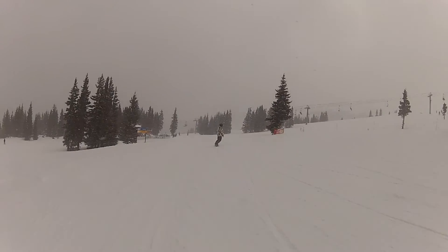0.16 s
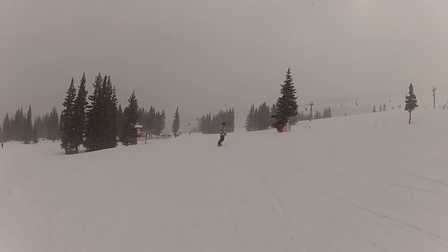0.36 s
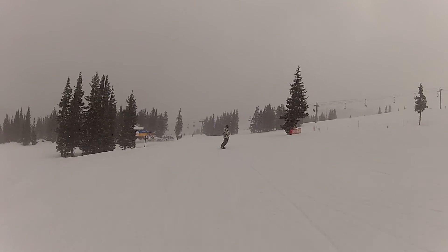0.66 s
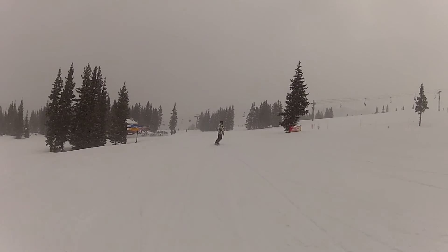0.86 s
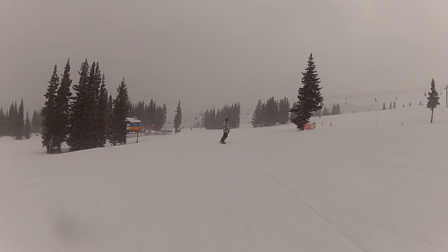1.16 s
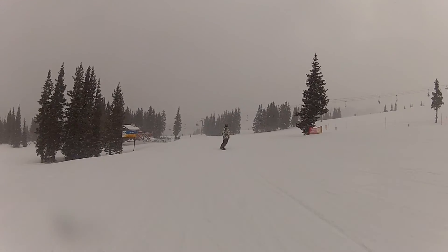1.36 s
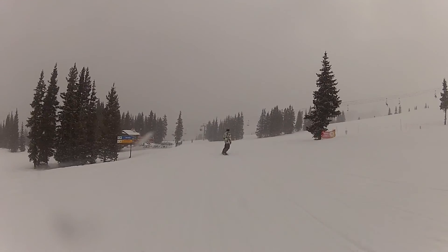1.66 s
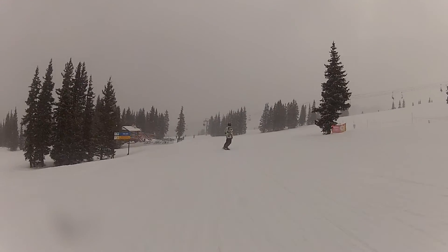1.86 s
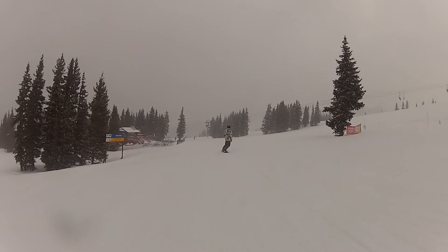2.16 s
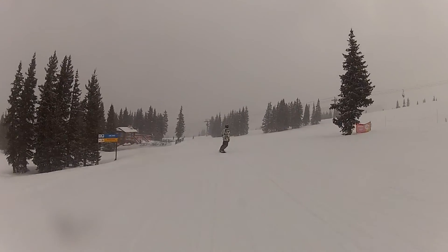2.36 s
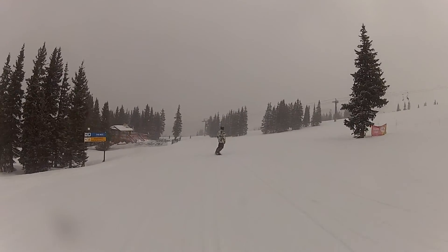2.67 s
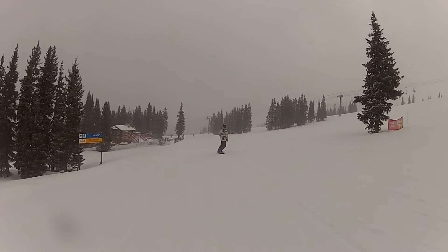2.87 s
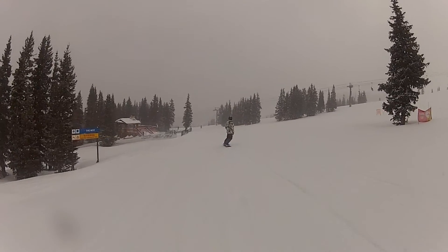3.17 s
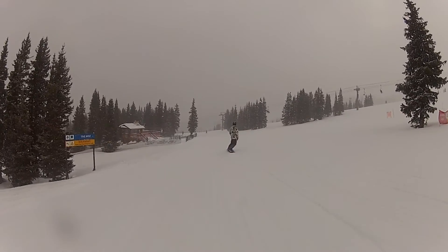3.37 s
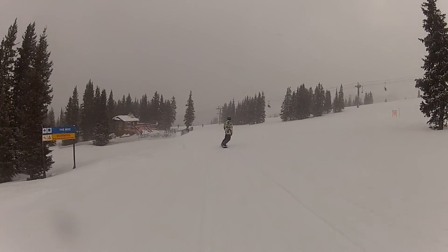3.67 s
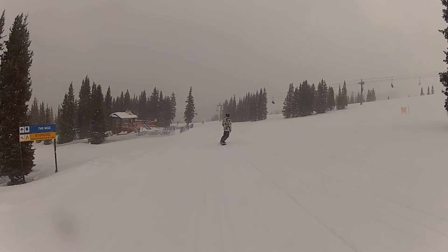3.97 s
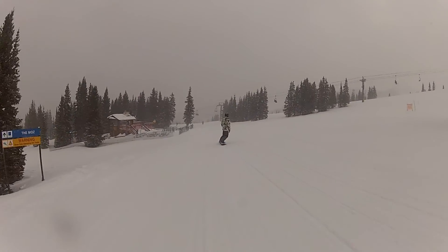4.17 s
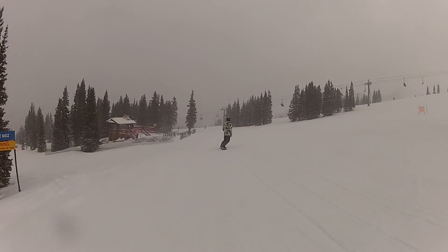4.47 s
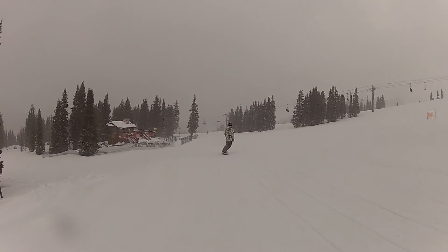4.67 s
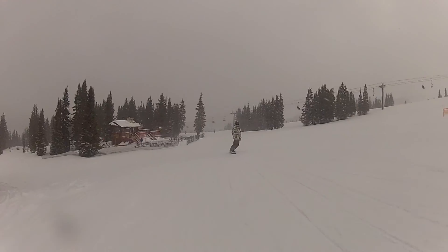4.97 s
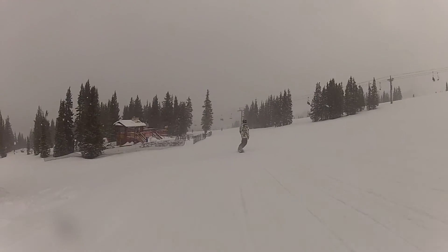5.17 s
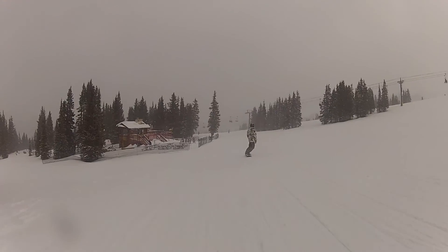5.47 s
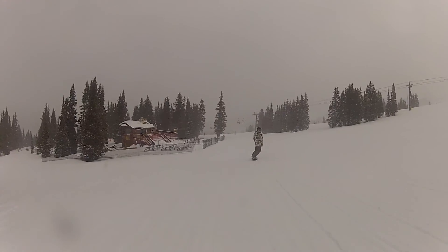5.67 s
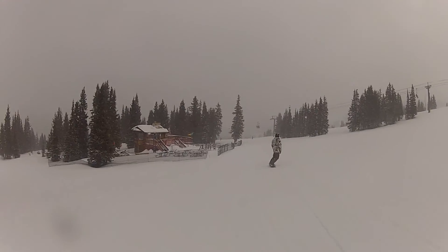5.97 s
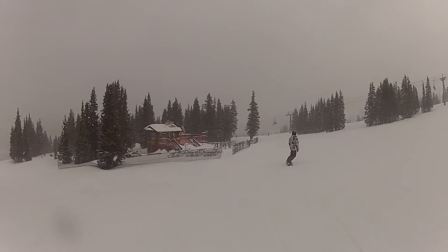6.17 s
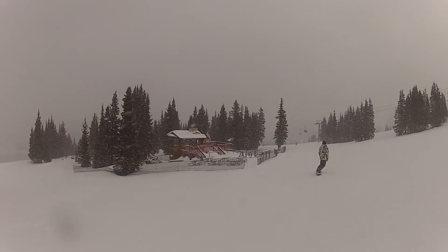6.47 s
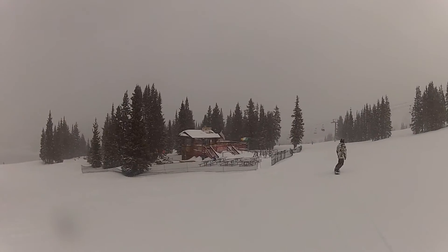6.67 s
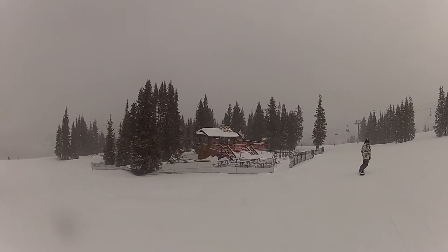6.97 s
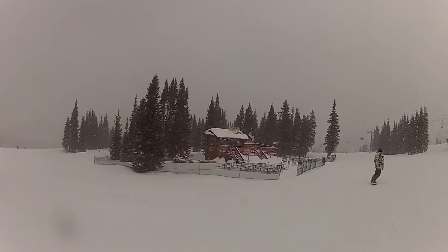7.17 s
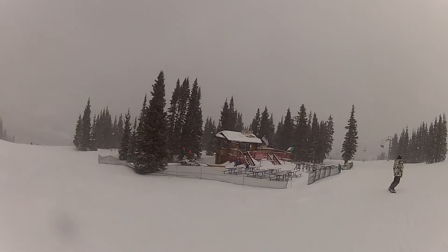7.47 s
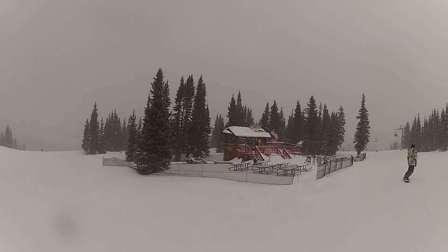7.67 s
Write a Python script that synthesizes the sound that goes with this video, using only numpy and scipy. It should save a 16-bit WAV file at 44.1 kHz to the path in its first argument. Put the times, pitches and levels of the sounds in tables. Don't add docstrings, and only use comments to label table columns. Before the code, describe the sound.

A snowboard hisses and scrapes over snow while wind rumbles and thumps on a sealed camera housing, with sharp plastic clicks and tiny icy ticks throughout.

```python
import sys
import numpy as np
from scipy import signal
from scipy.io import wavfile
from scipy.ndimage import uniform_filter1d, minimum_filter1d

SR = 44100
rng = np.random.default_rng(int(sys.argv[2]) if len(sys.argv) > 2 else 0)


def nominal_scale(level):
    x = np.asarray(level, float) / 20
    return 10 ** x


def digitize_waveform(pressure):
    field = np.atleast_2d(pressure).T
    bounded = np.clip(field, -1, 1)
    quanta = np.round(bounded * 32767).astype(np.int16)
    wavfile.write(sys.argv[1], SR, quanta)


N = 344421


def evened(x):
    return x / np.sqrt(np.mean(x ** 2) + 1e-20)


def control(rows, column):
    rows = np.array(rows)
    return np.interp(np.arange(N) / SR, rows[:, 0], rows[:, column])


def bump(centre_s, length_s):
    t = np.arange(N) / SR
    return np.exp(-(2 * (t - centre_s) / length_s) ** 2)


def noise(colour, size, patchy_db, flicker_db):
    frames = 4 * N // size + 5
    hz = np.fft.rfftfreq(size, 1 / SR)
    real, imaginary, patches = rng.standard_normal((frames, len(hz), 3)).T
    patches = uniform_filter1d(patches, size=8, axis=0)
    patches = evened(uniform_filter1d(patches, size=10, axis=1))
    flicker = evened(uniform_filter1d(rng.standard_normal(frames), size=4))
    curve_hz, curve_db = np.transpose(colour)
    colour_db = np.interp(np.log(hz + 1), np.log(curve_hz + 1), curve_db, left=-90, right=-90)
    level_db = colour_db[:, None] + patchy_db * patches + flicker_db * flicker
    z = (real + 1j * imaginary) * nominal_scale(level_db)
    return evened(signal.istft(z, nperseg=size, noverlap=3 * size // 4)[1][:N])


def ring(modes, phases):
    t = np.arange(600) / SR
    x = 0
    for (hz, db, t60), phase in zip(modes, phases):
        x = x + nominal_scale(db - 60 * t / t60) * np.sin(2 * np.pi * (hz * t + phase))
    x = x * (1 - np.exp(-t / .00045))
    return x / abs(x).max()


# (time [s], level [dB])
WIND_ROAR = [(0.0, -49), (0.82, -52), (0.96, -52.5), (2.54, -51.5), (2.56, -48), (3.5, -52.5), (3.59, -49),
             (3.81, -54.5), (4.3, -55), (6.07, -60), (6.29, -57), (6.35, -61.5), (6.63, -59.5),
             (7.81, -55.5)]
# (time [s], level over the buffeting [dB], length [s])
GUSTS = [(0.798, 15, .1), (1.073, 10, 0.081), (2.54, 5, .1), (2.766, 11, 0.13), (3.482, 10, 0.11),
         (3.7, 13.5, 0.11), (5.123, 6, .08), (6.26, 8, 0.11), (7.094, 5.5, 0.12), (7.355, 12, .06),
         (7.56, 13, 0.073)]
# (frequency [Hz], level [dB per Hz])
BUFFET_COLOUR = [(7.1, -33.5), (12, 4), (81, -3.5), (120, -4), (160, -26), (260, -120)]
# (frequency [Hz], level [dB per Hz])
ROAR_COLOUR = [(35, -47), (60, 13), (86, -2), (221, -3), (372, -7), (633, -20.5), (900, -18.5), (1170, -60),
               (1980, -120)]
# (frequency [Hz], level [dB per Hz])
AIR_COLOUR = [(600, 3.5), (1400, -10), (5000, -8), (5900, -10)]


def wind():
    roar_db = control(WIND_ROAR, column=1)
    gust_db = sum(db * bump(s, length_s) for s, db, length_s in GUSTS)
    buffet_db = -57.5 + 0.5 * (roar_db + 53) + gust_db
    buffet = nominal_scale(buffet_db) * noise(BUFFET_COLOUR, size=4096, patchy_db=1.7, flicker_db=3.5)
    roar = nominal_scale(roar_db + 0.55) * noise(ROAR_COLOUR, size=1024, patchy_db=0.5, flicker_db=1.03)
    air = nominal_scale(-70.0) * noise(AIR_COLOUR, size=256, patchy_db=4.5, flicker_db=5.5)
    lurch_s, lurch_hz = 6.255, 30
    swing = np.sin(2 * np.pi * lurch_hz * (np.arange(N) / SR - lurch_s))
    lurch = nominal_scale(-43.5) * bump(lurch_s, length_s=.09) * swing
    return buffet + roar + air + lurch


# (time [s], level [dB])
SLIDE = [(0.0, -52.5), (0.45, -55), (0.9, -56.5), (1.8, -59), (2.25, -54), (2.5, -56), (2.75, -51),
         (3.1, -58), (3.3, -54), (3.9, -59), (4.6, -63), (5.5, -66.5), (6.3, -67.5), (6.42, -70.5),
         (6.52, -69), (6.56, -58.5), (6.9, -62), (7.81, -62.5)]
# (frequency [Hz], level [dB per Hz])
HISS_COLOUR = [(290, -19), (500, 1), (647, -9), (780, -8.5), (948, 2), (1360, 2.5), (1880, -2.5), (2280, 2),
               (3020, -4), (3480, -2.5), (4330, -18), (5160, -7), (5900, -22.5), (7670, -45), (13000, -120)]
# (frequency [Hz], level [dB], t60 [s])
SHELL = [
    [(940, 1, 0.0034), (1427, 8.5, 0.0053)],
    [(1900, -1.5, 0.0046), (2236, 3.5, 0.006), (2460, -23, 0.015)],
    [(3385, -18, 0.035), (3537, 1, 0.0068), (3790, 6, 0.0022)],
    [(4494, 26.5, 0.0021), (5016, 4, 0.0061)],
]


def board():
    hiss = noise(HISS_COLOUR, size=256, patchy_db=2.0, flicker_db=0.6)
    ridge_hz, ridge_width_hz = 2197, 160
    ridge = signal.lfilter(*signal.iirpeak(ridge_hz, ridge_hz / ridge_width_hz, SR), hiss)
    hiss = hiss + nominal_scale(-12) * evened(ridge)
    grains_per_s = 320
    lands = rng.random(N) < grains_per_s / SR
    size = nominal_scale(3.2 * np.minimum(rng.exponential(1, N), 3)) * lands
    grains = 0
    for group, group_db in zip(SHELL, (-11.5, -0.5, -4.0, -3.5)):
        spread_db = 7.1 * rng.standard_normal(N).clip(-2, 2)
        share = nominal_scale(group_db + spread_db) * rng.choice([-1, 1], N)
        grains = grains + signal.oaconvolve(size * share, ring(group, rng.random(3)))[:N]
    return nominal_scale(control(SLIDE, column=1)) * (nominal_scale(1.0) * hiss + nominal_scale(-5.5) * evened(grains))


# (time [s], peak level [dB], brightness [dB per mode group], focus [dB per group squared])
KNOCKS = [(0.0739, -21, 8, -10.5), (0.6062, -30.5, -4, -2.5), (0.9413, -26.5, -15.5, -11.2),
          (1.0898, -26, -4, -3.5), (1.3748, -28.5, -22, -12.5), (1.411, -26, -2, -6.0),
          (1.6179, -16.5, -0.3, -8.5), (2.9365, -28, -4, -7), (3.8273, -30, 1, -1.5),
          (3.8341, -18, 12.5, -10), (4.0037, -31.5, 6, -3.5), (4.6325, -26.3, 6.5, -0.5),
          (4.6495, -30.3, 18, -15), (5.0732, -31.5, 10.5, -5), (5.0883, -36.6, 1.5, -0.5),
          (5.1829, -23.9, 9, -11.5), (5.2468, -28.5, 15, -15), (5.2622, -37, 0, 0),
          (5.2992, -36.5, 4.4, -1.4), (5.3627, -39, 8.6, -4.4), (5.8215, -42.5, -4, -6.2),
          (6.1, -36, -9.5, -1.5), (6.1528, -33, -8, -3), (6.2038, -33.5, -5, -3.0), (6.2993, -32, -4, -7),
          (6.318, -36.4, -2, -3), (6.3438, -32.5, 0.8, -2.5), (6.9163, -32, -1, -0.3),
          (7.1525, -35.5, -1, -3), (7.7962, -23.5, -2.5, -7.5)]
# (time [s], peak level [dB], brightness [dB per mode group])
BACK_TICKS = [(0.1376, -34, -21), (0.4091, -36.5, -9), (0.7034, -31.5, -5), (1.0032, -32.5, -5),
              (1.5406, -33.5, -31), (1.7427, -40.8, -3.9), (1.8893, -37.5, -6), (2.1632, -29.5, -7),
              (2.3833, -36.5, -2), (3.2512, -37, -4.0), (3.2726, -36, 0), (3.636, -35, -12),
              (3.7283, -35.5, -5.0), (3.911, -38.5, -4.5), (4.1316, -33.5, -7.5), (4.816, -45.5, 1),
              (5.2127, -40, -6.9), (5.3466, -40.5, -14), (5.7269, -50, -8.2), (5.8749, -51, -3),
              (6.2316, -40, -7), (6.293, -45.8, -12), (6.368, -37, -10), (6.8443, -47, 1),
              (6.9563, -42, -9), (7.319, -41, -3), (7.3594, -36, -4.5), (7.4979, -37, -28),
              (7.624, -47.5, 2), (7.6536, -38.5, -2)]
# (time [s], peak level [dB], brightness [dB per mode group])
SIDE_TICKS = [(0.1706, -31.5, -3), (0.3094, -32, -4.5), (0.5918, -41, 15), (0.7078, -38, 1),
              (1.1402, -37.5, 1), (1.645, -43.5, 1), (1.7215, -35.5, -3), (1.7656, -37, -5),
              (2.1813, -47, -4), (2.2214, -31.5, -1), (2.8492, -30, 0), (3.0214, -33.5, -6),
              (3.2049, -33.5, -1.5), (3.305, -31, -4.5), (3.4586, -32.5, -5.5), (3.6486, -35.5, -2.2),
              (3.7577, -39.5, 1), (4.2216, -43.4, 1), (4.3258, -34, -1), (4.6633, -42, 3),
              (5.0968, -39.5, -1.7), (5.2273, -38.5, -1.4), (5.8872, -48.5, 3), (6.1735, -45.2, -6),
              (6.2226, -42, 2), (6.324, -42, -2.7), (6.8396, -41.5, 0), (7.1931, -38, 0.5),
              (7.4011, -41, -5), (7.458, -40, -7)]
# (time [s], peak level [dB], brightness [dB per mode group])
FRONT_TICKS = [(0.3044, -33.4, -2), (0.6346, -28.5, 2.8), (1.079, -35.7, 11), (1.2816, -37, 0),
               (1.482, -35.5, -2.5), (1.8713, -40.6, 8), (2.3498, -34.5, -1), (2.3698, -32.5, 7.5),
               (2.4553, -28.5, 14), (2.6847, -23.5, 7.5), (2.9992, -31, 19), (3.1028, -36.5, 2),
               (3.151, -36.5, 10), (3.3794, -37.5, 1), (3.3955, -36.6, 9), (3.4127, -37, -0.1),
               (4.1748, -38.5, 3.5), (4.3624, -41, 7), (4.658, -39.8, 15), (4.8636, -41, 3),
               (5.0127, -45.0, 6), (5.0477, -45, 4), (5.0603, -44, 2.8), (5.1997, -42, 5.0),
               (5.267, -45.0, 3), (5.3106, -45, 6), (6.7163, -35.5, -1.5), (6.8658, -40, 8),
               (7.313, -38.5, 0.0), (7.4388, -38, -2)]
# (time [s], peak level [dB])
PORT_TICKS = [(0.457, -41), (0.6535, -40), (0.7445, -36.5), (1.2301, -41), (1.4159, -44.6), (1.8647, -40),
              (2.309, -38), (2.325, -39), (2.4504, -44), (2.5371, -41.5), (2.6467, -39.7), (2.7016, -33),
              (2.7955, -35), (2.9674, -40.4), (3.0914, -38), (3.352, -36.5), (3.58, -44.5), (3.6707, -42),
              (3.6798, -38.5), (3.816, -62), (4.093, -46), (4.288, -43.5), (4.354, -44), (4.4167, -46.5),
              (4.429, -49), (4.4634, -45), (4.6148, -46), (4.6238, -46.2), (4.9652, -48), (6.305, -47)]
COUPLING_DB = (-1.9, 1.1, -1.2, 2)


def ticks():
    hits = list(KNOCKS)
    for rows, focus_db in ((BACK_TICKS, -3), (SIDE_TICKS, -3), (FRONT_TICKS, -4.5)):
        hits += [(*row, focus_db) for row in rows]
    hits += [(*row, 4.5, -4) for row in PORT_TICKS]
    place = np.arange(4) - 1.5
    lean = 0.54
    out = np.zeros(N + 2000)
    for (s, peak_db, bright, focus), chance in zip(hits, rng.random((len(hits), 14))):
        share = nominal_scale(bright * place + focus * place ** 2 + np.array(COUPLING_DB))
        share = share / np.linalg.norm(share)
        phases = .3 * chance[:12].reshape(4, 3)
        tick = 0
        for group, gain, phase in zip(SHELL, share, phases):
            leaning = [(hz, db + lean * bright * k, t60) for k, (hz, db, t60) in enumerate(group)]
            tick = tick + gain * ring(leaning, phase)
        tick = tick * nominal_scale(peak_db + 3.0)
        at = round((s - .0002) * SR)
        out[at:at + len(tick)] += tick
        at += round((0.001073 + 0.0031 * chance[12]) * SR)
        out[at:at + len(tick)] += nominal_scale(-23.5 + 4.8 * chance[13]) * tick
    return signal.sosfilt(signal.butter(3, 650, "high", fs=SR, output="sos"), out[:N])


# (time [s], length [s], first pitch [Hz], settled pitch [Hz], level [dB])
WHISTLE = [
    (6.44, .19, 4880, 5170, -73),
    (6.69, .29, 5250, 5410, -63),
    (7.29, .2, 5290, 5400, -73),
    (7.49, .11, 5480, 5180, -71),
    (7.41, .19, 2400, 2420, -60),
    (6.7, .1, 2420, 2480, -63),
]


def whistle():
    out = np.zeros(N)
    for s, length, first_hz, hz, db in WHISTLE:
        t = np.arange(0, length, 1 / SR)
        waver, breaks = (evened(uniform_filter1d(rng.standard_normal(len(t)), size=400)) for _ in range(2))
        glide_s = .07
        glide = hz + (first_hz - hz) * np.exp(-(t / glide_s) ** 2)
        turns = np.cumsum(glide * (1 + .003 * waver)) / SR
        swell_db = -12 * (2 * t / length - .8) ** 2
        swell = nominal_scale(db + swell_db + 3.5 * breaks)
        out[round(s * SR):][:len(t)] += swell * np.sin(2 * np.pi * turns)
    return out


def scene():
    return np.tile(wind() + board() + ticks() + whistle(), (2, 1))


# (frequency [Hz], level [dB per Hz])
PREAMP_COLOUR = [(15, 1), (500, -8), (1000, -19.5), (3000, -19), (4500, -15), (5900, -20)]


def preamp_hiss(channels):
    each = [noise(PREAMP_COLOUR, size=1024, patchy_db=-2, flicker_db=0.5) for _ in range(channels)]
    return nominal_scale(-78) * np.array(each)


def sample_and_hold(sound):
    hold_hz = 12000
    low = signal.sosfilt(signal.butter(12, 5700, fs=SR, output="sos"), sound)
    mirrored = low * (1 + 2 * np.cos(2 * np.pi * hold_hz * np.arange(N) / SR))
    hz, _, z = signal.stft(mirrored, SR, nperseg=512)
    z = z * np.sinc(hz / hold_hz)[:, None]
    return hz, z + nominal_scale(-107) * np.exp(2j * np.pi * rng.random(z.shape[1:]))


def top_band_gate(hz, z):
    top_hz = 15330
    top = abs(z[0, hz > top_hz]).mean(0)
    under = abs(z[0, (hz > 13800) & (hz < top_hz)]).mean(0)
    under = uniform_filter1d(under, size=5)
    floor = uniform_filter1d(minimum_filter1d(top, size=30), size=30)
    opens = top > nominal_scale(15) * floor
    hz = hz[:, None]
    fringe = (under > 1.12 * uniform_filter1d(under, size=60)) * (hz < 15950)
    slope = nominal_scale(-11 - .011 * (hz - top_hz))
    gate = np.maximum(opens, fringe) * (hz < 16450) * slope
    return z * np.where(hz > top_hz, gate, 1)


def roll_off(x):
    return signal.sosfilt(signal.butter(12, 16500, fs=SR, output="sos"), x)


def record(dry):
    hz, z = sample_and_hold(dry + preamp_hiss(len(dry)))
    z = top_band_gate(hz, z)
    mix = signal.istft(z, SR, nperseg=512)[1][:, :N]
    return roll_off(mix)


dry = scene()
out = record(dry)
digitize_waveform(out)
```